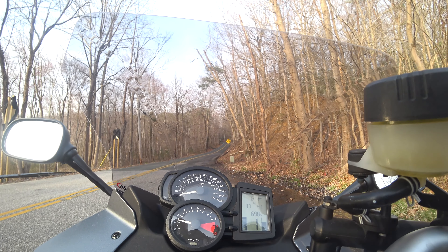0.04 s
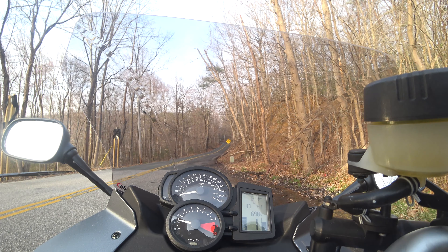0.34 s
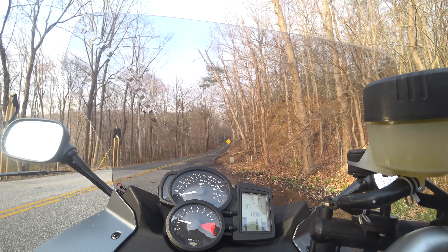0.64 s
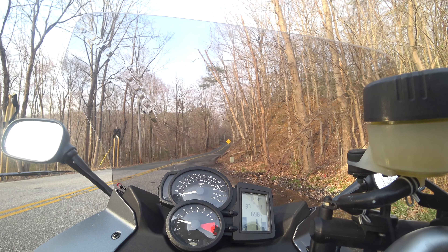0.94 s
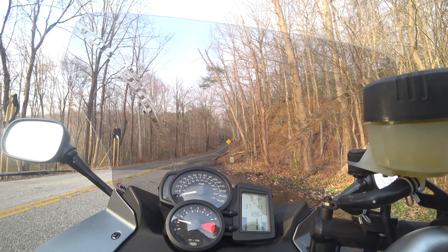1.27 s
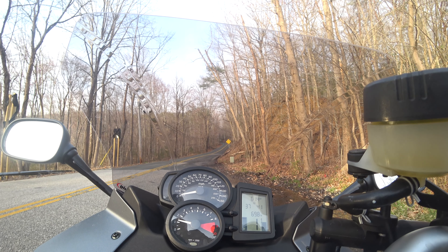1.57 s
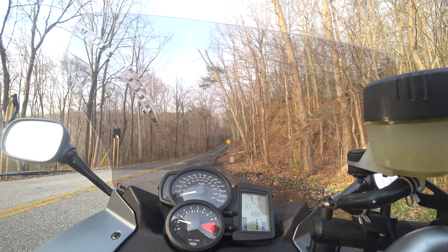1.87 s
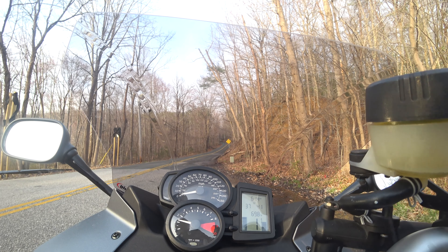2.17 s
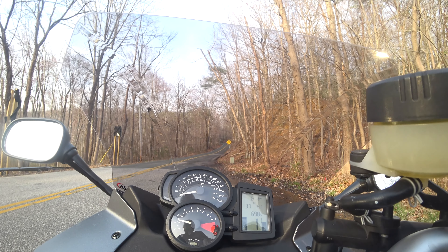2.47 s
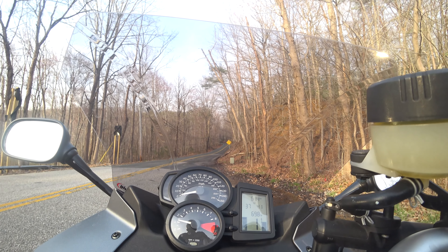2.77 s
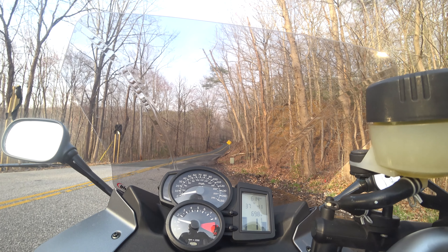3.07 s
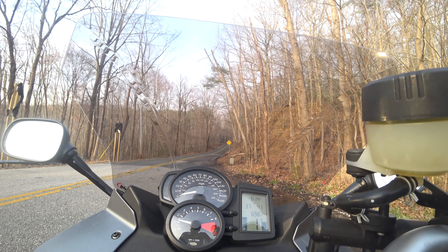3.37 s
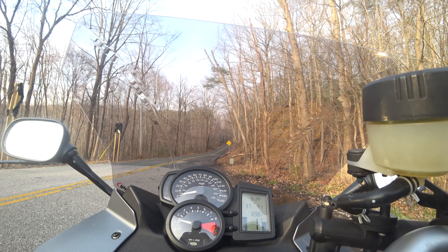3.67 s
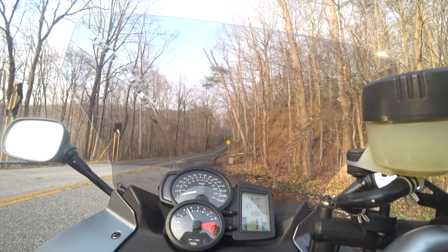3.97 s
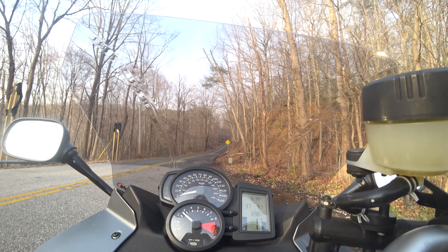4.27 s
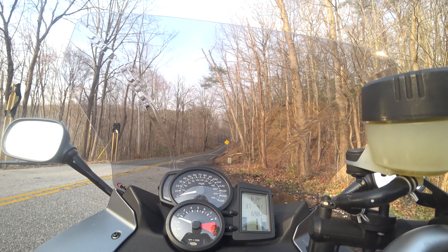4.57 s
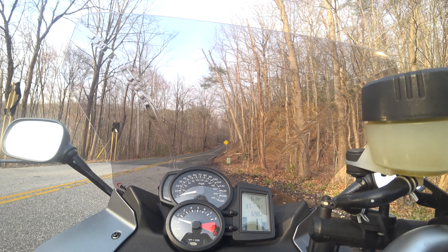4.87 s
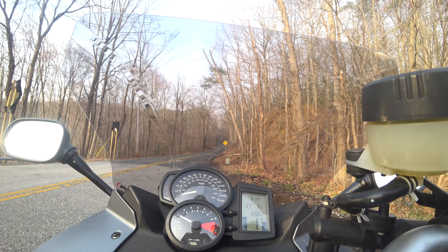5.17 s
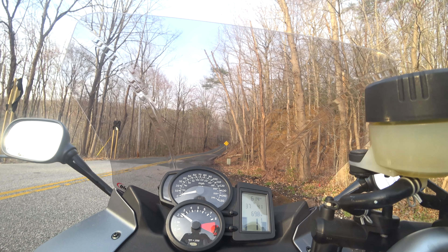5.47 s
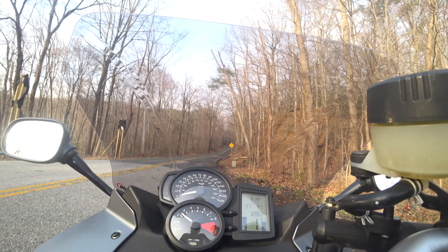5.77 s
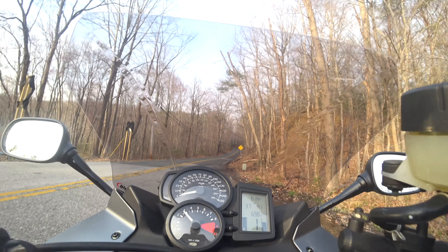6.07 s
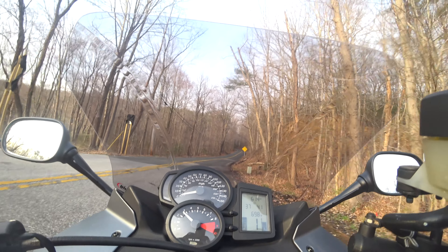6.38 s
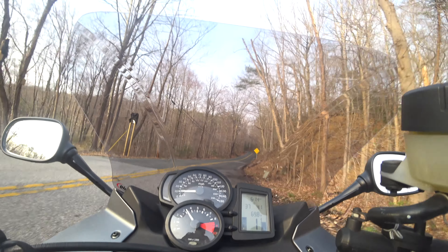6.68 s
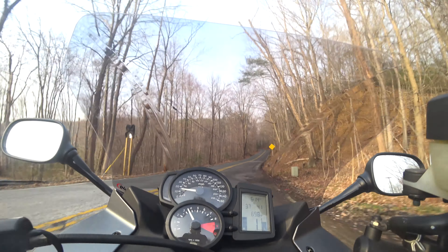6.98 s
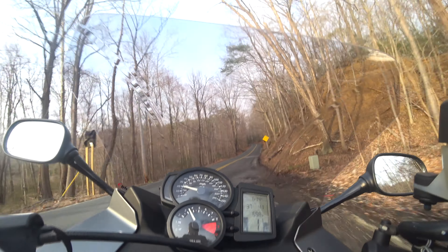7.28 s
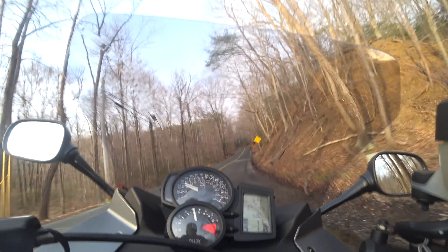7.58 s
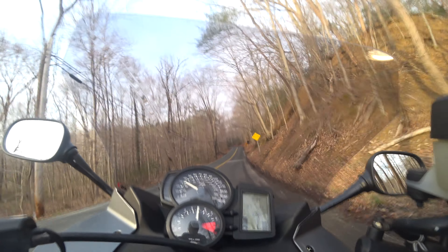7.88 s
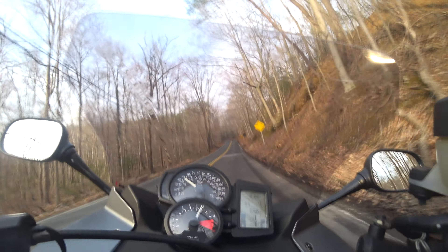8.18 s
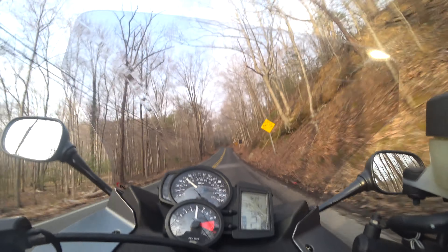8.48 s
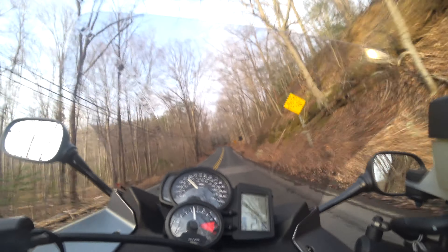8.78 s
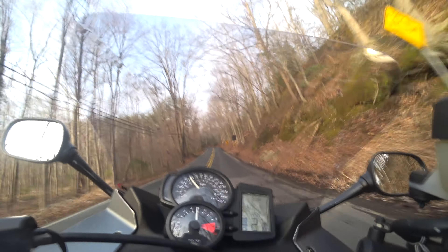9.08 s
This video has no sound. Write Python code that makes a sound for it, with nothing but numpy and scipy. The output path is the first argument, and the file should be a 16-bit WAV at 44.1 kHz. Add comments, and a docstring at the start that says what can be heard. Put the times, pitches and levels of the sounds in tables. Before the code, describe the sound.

A two-cylinder motorcycle idles with a low, uneven thudding, mechanical clatter and a few sharp valve ticks. The throttle is blipped once and the engine settles. It then pulls away with a wavering growl, gives a brief faint squeak and climbs in pitch. The note drops at an upshift and pulls again, while wind begins to rumble on a microphone mounted close behind the windscreen, outdoors on a road.

```python
"""On a motorcycle, at a camera behind the windscreen: the two-cylinder engine idles, is revved once,
then pulls away and shifts up. Evenly spaced firings boom through the camera mount and make the airbox
(the engine's air intake chamber) ring. Valves clatter and gears whine in step with them.
The windscreen adds a very quick echo, and wind starts to rumble as the bike gathers speed."""
import sys
import numpy as np
from scipy import signal
from scipy.fft import rfft, irfft
from scipy.io import wavfile
from scipy.ndimage import uniform_filter1d

SR = 44100
rng = np.random.default_rng(int(sys.argv[2]) if len(sys.argv) > 2 else 0)


def transcribe(signal):
    """Save signal, clipped to [-1, 1], as a 16-bit WAV file at the path in sys.argv[1]."""
    frames = np.atleast_2d(signal).T
    limited = np.clip(frames, -1, 1)
    pcm = np.round(limited * 32767).astype(np.int16)
    wavfile.write(sys.argv[1], SR, pcm)


N = 402633
TIME = np.arange(N) / SR
FREQ = np.arange(N // 2 + 1) * SR / N + 1e-3  # just above zero, so it is safe to divide by

# wind on the camera housing: t/s, level/dB
WIND_LEVELS = [(0, -75), (5.8, -70), (7.4, -42), (8.05, -43), (8.25, -25.5), (8.6, -35.5), (9.13, -30.5)]
# tone colour of the chain and gear hiss: f/Hz, relative level/dB
HISS_COLOUR = [(2940, -4), (5000, -6.5), (5840, -8.5), (7200, -6.5), (8090, -8.5), (9790, -6.5),
               (10900, -4.5), (11800, 2.5), (16000, -10)]
# gear teeth meeting: multiple of the firing rate, relative level/dB
GEAR_TONES = [(13, -35), (14, -40), (19, -39), (35, -38.5)]
# the sharpest valve ticks, then two clunks as the revving starts and as the gear engages: t/s, relative
# level/dB
SHARP_TICKS = [(0.2972, -39), (0.591, -35), (0.8839, -36), (1.5723, -34), (1.875, -36), (3.4451, -36),
               (3.7894, -35), (5.069, -34.5)]
# tone colour of the clatter, at idle and when pulling: f/Hz, relative level/dB
IDLE_CLATTER_COLOUR = [(450, -18), (720, -6), (1050, -1.5), (1600, -7), (2300, -11), (3400, -13),
                       (4300, -23), (5500, -28), (9000, -29.5)]
FAST_CLATTER_COLOUR = [(600, -3), (800, -4.5), (1150, -1), (1600, -4.5), (2300, -6.5), (3200, -10),
                       (4000, -13), (5000, -24.5), (9000, -51)]
# first gulps of air as the throttle snaps open: t/s, relative level/dB
AIR_GULPS = [(3.809, -21.5), (3.841, -12), (3.867, -14.5), (3.891, -15.5), (3.905, -17.5)]
# notes at which engine cases, gulps, intake ducts and airbox ring: f/Hz, width/Hz, relative level/dB
CASE_NOTES = [(1033, 9.9, 6.5), (1115.5, 62, 5), (1330, 127, -2), (1643, 40, -9)]
GULP_NOTES = [(236, 82, 6), (334, 51, 2.5), (526, 31, 16), (710, 120, -19)]
DUCT_NOTES = [(501.7, 20.3, 3.5), (538, 25, 4.5), (647, 130, -14.5), (709, 44, -8.5), (793, 30, -2)]
AIRBOX_NOTES = [(180.3, 22, 0), (254.4, 50, -1.5), (352, 22, -10.5)]
# notes at which the camera mount shakes: f/Hz, width/Hz, left gain, right gain
MOUNT_NOTES = [(52.4, 14.4, 0.5, 0.67), (72.1, 15, -1.23, 0.044), (99, 18.7, 0.36, 0.38)]
# firings per second on pulling away and shifting up, one for each turn of the crank: t/s, f/Hz
RIDE_RATES = [(5.05, 24.11), (5.15, 31.8), (5.21, 35.84), (5.31, 38.74), (5.48, 37.29), (5.84, 38.43),
              (5.98, 44.82), (6.06, 47.53), (6.3, 41.56), (6.57, 52), (6.71, 56.24), (6.9, 58.48),
              (7.16, 54.01), (7.25, 56.7), (7.47, 65.66), (7.97, 86.1), (8.12, 90.78), (8.23, 102.3),
              (8.39, 84.05), (8.45, 93.17), (8.49, 82.55), (8.55, 68.37), (9.04, 81.43), (9.13, 80)]
# the rider's hand on the throttle: t/s, opening (0 shut, 1 wide open)
RIDE_THROTTLE = [(5.05, 0.18), (5.3, 0.32), (5.82, 0.38), (6.0, 0.71), (6.22, 0.55), (6.52, 0.9),
                 (6.72, 0.78), (6.92, .58), (7.1, 0.78), (8.14, 0.72), (8.19, 0.53), (8.36, 0.21),
                 (8.42, 0.69), (8.62, 0.68), (9.13, 0.75)]
# the engine with the throttle shut: firing rate f/Hz, then level/dB of exhaust, drone, bark, clatter, hiss
SHUT_LEVELS = [(20.9, -37.7, -50, -52.5, -43.5, -57), (41, -30.3, -43.5, -44, -34.5, -51.5),
               (56.6, -28, -37, -39, -32.5, -50), (74.4, -35, -35, -37.5, -29.5, -47),
               (101, -40, -36, -40, -27.5, -45.5)]
# what a wide-open throttle adds: level/dB for each of those five sounds
OPEN_BOOSTS = (6.3, 16.2, 17.35, 0.9, 1.2)
# the clutch slips or spins free and the hiss swells (rev, pull-away, shift): t/s, length/s, rise/dB
CLUTCH_SLIPS = [(3.795, 0.42, 4.5), (5.797, 0.92, 3.5), (8.08, 0.41, 6.5)]

# single swells: t/s, length/s, rise/dB
FLUTTER = (1.24, 0.87, 4.8)  # the airbox flutters louder during the idle
FREE_REV = (3.68, 0.58, 2.9)  # with no load, the revving engine rattles harder
HONK = (7.5, 0.4, 3.8)  # the ducts honk as the clutch bites
OVERRUN = (8.27, 0.16, 15)  # the exhaust booms as the rider eases off to shift
TAKE_UP = (8.39, 0.058, 6.8)  # the cases rattle as the next gear starts to pull

IDLE_HZ, BLIP_HZ, BLIP_S = 20.32, 60.04, 3.778  # the "blip" is the one quick rev while standing


def undb(db):
    """Turn decibels into a number to multiply by."""
    return 10 ** (np.asarray(db) / 20)


def curve(table):
    """Join (time, value) points with straight lines, one value per sample."""
    return np.interp(TIME, *np.transpose(table))


def swell(start, length, rise_db):
    """An arch-shaped rise and fall, in dB."""
    return rise_db * np.sin(np.pi * np.clip((TIME - start) / length, 0, 1))


def noise():
    """White noise: an even hiss."""
    return rng.standard_normal(N)


def unit(x):
    """Scale a sound so its average strength (rms) is 1."""
    return x / np.sqrt(np.mean(x ** 2))


def steady(x, size=4340):
    """Hold the strength of a sound near 1 over time, leaving its single beats intact."""
    power = np.atleast_2d(x).mean(axis=0) ** 2
    return x / np.sqrt(uniform_filter1d(uniform_filter1d(power, size), size // 2) + 1e-18)


def shape(x, response):
    """Filter a sound: the response says how much of each frequency gets through."""
    return irfft(rfft(x) * response, N)


def waver(hz):
    """A smooth random wobble of strength 1, changing up to about hz times a second."""
    return unit(shape(noise(), 1 / (1 + (FREQ / hz) ** 4)))


def colour(points):
    """A filter drawn through (f/Hz, level/dB) points."""
    hz, db = np.transpose(points)
    return undb(np.interp(np.log(FREQ), np.log(hz), db))


def resonance(hz, width):
    """A filter that rings at one note; the smaller the width, the longer it rings."""
    return 1 / (1 + 1j * (FREQ - hz ** 2 / FREQ) / width)


def body(notes):
    """A filter for an object that rings at several notes."""
    return sum(undb(db) * resonance(hz, width) for hz, width, db in notes)


def windscreen(delay_s=1 / 265, share=0.56, dull_hz=9800):
    """A filter that adds the windscreen's echo, which lacks the highest treble."""
    return 1 + share * np.exp(-2j * np.pi * FREQ * delay_s) / (1 + (FREQ / dull_hz) ** 10)


def stereo_noise(loudness, response, side_db):
    """Pulsing noise: a middle part with the windscreen's echo, and a side part for width."""
    mid = shape(loudness * noise(), response * windscreen())
    side = shape(loudness * noise(), response) * undb(side_db)
    return np.array([mid + side, mid - side])


def burst(turns, start, length):
    """A loudness that jumps up at the same point of every turn, then fades; both given in turns."""
    return np.exp(-((turns - start) % 1) / length)


def firings(turns, scatter_db, uneven_db):
    """One click per turn; the two cylinders differ a little and no two firings are alike."""
    at = np.flatnonzero(np.diff(np.floor(turns[:-1])) > 0)
    late = (np.ceil(turns[at]) - turns[at]) / (turns[at + 1] - turns[at])
    size = undb(scatter_db * rng.standard_normal(len(at)) + uneven_db * (-1) ** np.arange(len(at)))
    clicks = np.zeros(N)
    clicks[at], clicks[at + 1] = size * (1 - late), size * late  # each click falls between two samples
    return clicks


def camera_whine():
    """Faint steady tones from the camera's electronics."""
    tones = [(7499, -81), (8495, -81), (9001, -81), (13501, -75)]
    return sum(undb(db) * np.sin(2 * np.pi * hz * TIME) for hz, db in tones)


def wind():
    """Wind buffets the housing with a low rumble, different in each ear."""
    rumble = colour([(10, -3), (30, 7), (60, -1.5), (130, -6), (400, -12), (2000, -45)])
    return undb(curve(WIND_LEVELS)) * np.array([unit(shape(noise(), rumble)) for _ in range(2)])


def squeal(hz=9800, db=-52):
    """A thin squeal as the engine speed peaks at the gear change."""
    fade = np.interp(TIME, [7.9, 8.25, 8.55], [0, 1, 0])
    return undb(db) * fade * unit(shape(noise(), resonance(hz, 157.4) ** 2))


def squeak(start_s=6.98, length_s=0.154, from_hz=1570, to_hz=1710, db=-32):
    """A short rising squeak as the bike rolls off."""
    along = np.clip((TIME - start_s) / length_s, 0, 1)
    hz = from_hz + (to_hz - from_hz) * along
    return undb(db) * np.sin(np.pi * along) * np.sin(2 * np.pi * np.cumsum(hz) / SR)


def hiss(turns, revs):
    """Chain and gears sizzle; above them lies an even hiss, the same in both ears."""
    pulse = 1 + 0.5 * burst(turns / 2, start=0.23, length=0.29)
    below_top = 1 / (1 + (FREQ / 11100) ** 40)
    sizzle = steady(stereo_noise(pulse, colour(HISS_COLOUR) * below_top, side_db=-0.5))
    top = unit(shape(noise(), (colour(HISS_COLOUR) + 0.26) * (1 - below_top)))
    return steady(sizzle + undb(-3 - 5.6 * revs) * top)


def gears(turns, rate, db_per_octave=4, rough=0.64):
    """Gear teeth whine through the cases, louder whenever they glide past a note the cases ring at."""
    teeth = 0
    for multiple, db in GEAR_TONES:
        strength = undb(db) * (1 + rough * waver(27))
        teeth = teeth + strength * np.sin(2 * np.pi * multiple * turns + rough * waver(21))
    cases = body(CASE_NOTES) + undb(-10) * resonance(722, 36)
    return shape(teeth, cases) * undb(db_per_octave * np.log2(rate / 80))


def valve_ticks(turns, revs, scatter_db=0.5, decay_s=0.0048):
    """At idle a valve shuts with a bright tick every second turn; a few ticks stand out, and two clunks join
    them."""
    cam = (turns / 2 - 0.25) % 1  # the camshaft works the valves and turns at half speed
    stroke = np.cumsum(np.diff(cam, prepend=1) < 0)
    force = undb(-43 + scatter_db * np.clip(rng.standard_normal(stroke[-1] + 1), -2, 2))
    regular = force[stroke] * np.exp(-cam / 0.06) * np.clip(1 - revs / 0.16, 0, 1)
    sharp = sum(undb(db) * (TIME >= s) * np.exp(-np.abs(TIME - s) / decay_s) for s, db in SHARP_TICKS)
    ring = colour([(900, -20), (1600, 13), (1900, 16), (2400, -2), (3500, 7), (5000, -7),
                   (9500, -5), (12000, -7), (16000, -26)])
    return undb(-3.5) * stereo_noise(np.maximum(regular, sharp), ring, side_db=-8)


def clatter(turns, revs):
    """Valves and pistons knock on the cases in step with the crank; at speed this blurs into a rasp."""
    rattle = 0.39 + 0.5 * burst(turns, 0.42, 0.14) + 0.35 * burst(turns, 0.86, 0.18)
    knocks = 0.57 + 2.6 * burst(turns, 0.43, 0.19) + 0.5 * burst(turns, 1.0, 0.22)
    valves = 0.14 + burst(turns / 2, 0.21, 0.032) + 0.4 * burst(turns / 2, 0.7, 0.076)
    cases = body(CASE_NOTES) * resonance(1136, 810)
    slow = steady(stereo_noise(rattle, colour(IDLE_CLATTER_COLOUR), side_db=-17))
    slow += undb(-0.5) * steady(stereo_noise(knocks, cases, side_db=-18))
    slow += undb(-6.5) * steady(stereo_noise(valves, resonance(1928, 140) ** 2, side_db=-7.5))
    rasp_colour = colour(FAST_CLATTER_COLOUR) * (1 + 0.6 * resonance(3185, 44) + 0.25 * resonance(2885, 40))
    rasp = steady(stereo_noise(1 + burst(turns, 0.19, 0.75), rasp_colour, side_db=-8.5))
    ring = steady(shape(firings(turns, scatter_db=1.2, uneven_db=1.5), cases * resonance(1100, 600)))
    fast = rasp + undb(-4 + 6 * revs) * ring
    blur = np.clip(revs / 0.43, 0, 1)
    return steady(np.sqrt(1 - blur) * slow + np.sqrt(blur) * fast)


def gulps():
    """The throttle snaps open and the first few gulps of air bark through the airbox."""
    clicks = np.zeros(N)
    for s, db in AIR_GULPS:
        clicks[int(s * SR)] += undb(db)
    ring = body(GULP_NOTES) * resonance(360, 490)
    return undb(-1) * shape(clicks, ring) / np.abs(irfft(ring, N)).max()


def pipe_echoes(trips_s=(0.0017, 0.0029, 0.0053), share=0.57):
    """Trips up and down the pipes smear each pulse in time without changing its tone colour."""
    echoes = [np.exp(-2j * np.pi * FREQ * trip) for trip in trips_s]
    return np.prod([(echo - share) / (1 - share * echo) for echo in echoes], axis=0)


def breathing(turns, revs, response, air, idle_db, fast_db):
    """The engine breathes through a duct: a flutter at idle, soft beats at low speed, then a tone."""
    clicks = shape(firings(turns, scatter_db=0.7, uneven_db=0.7), pipe_echoes())
    beats = steady(shape(clicks, air * resonance(234, 580)))
    ringing = shape(clicks, response) / np.sqrt(np.gradient(turns) * np.mean(np.abs(response) ** 2))
    soft = 2.6 * np.exp(-(revs / 0.22) ** 2)
    tone = (ringing + soft * beats) / np.hypot(1, soft)
    rush = steady(stereo_noise(0.25 + burst(turns, 0.47, 0.98), air, side_db=-5))
    breath = undb(fast_db + (idle_db - fast_db) * np.exp(-revs / 0.14))  # rushing air against tone
    return (tone + breath * rush) / np.hypot(1, breath)


def duct_bark(turns, revs):
    """The intake ducts ring and give the growl its edge."""
    tilt = colour([(150, -46), (340, 5), (470, 2.5), (860, 0), (1000, -5.5), (2500, -79)])
    air = colour([(300, -6), (450, 5), (570, 6), (740, -2.5), (850, -24), (1100, -34), (2500, -41)])
    return breathing(turns, revs, body(DUCT_NOTES) * tilt, air, idle_db=6, fast_db=-16)


def airbox_drone(turns, revs):
    """The airbox sings whenever a multiple of the firing rate meets one of its notes."""
    tilt = colour([(90, -11), (150, -52), (175, -4), (197, -30.5), (215, 2.5), (245, 6.5),
                   (285, 9.5), (310, 6), (390, -2), (500, 4), (1200, -49)])
    air = colour([(90, -13), (165, 1), (260, 4.5), (350, 0), (420, -32), (900, -82)])
    sung = breathing(turns, revs, body(AIRBOX_NOTES) * tilt, air, idle_db=4, fast_db=-18)
    # coasting on a shut throttle, it sounds deeper and hollower
    coasting = np.exp(-(throttle() / 0.22) ** 2) * np.clip(revs / 0.21, 0, 1)
    hollow = shape(sung, colour([(180, 10), (225, -1), (270, -14), (400, -5)]))
    return (1 - coasting) * sung + coasting * hollow


def exhaust(turns, revs):
    """Firings boom through the mount, which rocks so the two sides differ; at idle they thud unevenly."""
    mount = sum(np.outer(gains, resonance(hz, width)) for hz, width, *gains in MOUNT_NOTES)
    muffler = colour([(18, -30), (38, 6.5), (55, 6), (90, 3), (118, 4.5), (150, -3), (300, 6), (900, -14)])
    boom = steady(shape(firings(turns, scatter_db=0.84, uneven_db=0.5), mount * muffler))
    thud_ring = -np.array([resonance(90.1, 25), resonance(91.8, 23.7)]) ** 2
    thuds = steady(shape(firings(turns, scatter_db=3.5, uneven_db=1.5), thud_ring))
    # the pistons add a throb at the crank's rate and at twice that rate
    throb = np.sin(4 * np.pi * (turns + 0.1)) + 0.18 * np.sin(2 * np.pi * turns)
    gas = stereo_noise(burst(turns, 0, 0.56), resonance(88, 41) ** 2, side_db=1.5)
    idle = thuds + undb(1) * throb + undb(-6) * steady(gas)
    idling = np.clip(1 - revs / 0.24, 0, 1)
    return steady((1 - idling) * boom + idling * idle)


def throttle(open_s=0.045, shut_s=0.052):
    """How far the throttle is open: shut at idle, one quick snap for the blip, then the ride."""
    snap = np.interp(TIME - BLIP_S, [0, open_s, open_s + shut_s], [0, 1, 0])
    return np.where(TIME < RIDE_THROTTLE[0][0], snap, curve(RIDE_THROTTLE))


def firing_rate(run_up_s=0.2, hang_s=0.04, coast_hz_per_s=84):
    """Firings per second: idle, a blip that runs up, hangs and coasts back down, then the ride."""
    since = TIME - BLIP_S
    run_up = (BLIP_HZ - IDLE_HZ) * np.sin(np.pi / 2 * np.clip(since / run_up_s, 0, 1))
    coast = coast_hz_per_s * np.maximum(since - run_up_s - hang_s, 0)
    return np.where(TIME < RIDE_RATES[0][0], IDLE_HZ + np.maximum(run_up - coast, 0), curve(RIDE_RATES))


def scene(wobble_turns=0.003, wander_db=0.7):
    """One slightly unsteady crank drives the engine's sounds; speed and throttle set their loudness."""
    rate, opening = firing_rate(), throttle()
    turns = 0.5 + np.cumsum(rate) / SR + wobble_turns * waver(10)
    revs = np.clip((rate - 21) / 80, 0, 1)  # 0 at idle, 1 at the gear change
    rates, *shut_levels = np.transpose(SHUT_LEVELS)
    voices = [(exhaust, swell(*OVERRUN)),
              (airbox_drone, swell(*FLUTTER)),
              (duct_bark, swell(*HONK)),
              (clatter, swell(*FREE_REV) + swell(*TAKE_UP)),
              (hiss, sum(swell(*slip) for slip in CLUTCH_SLIPS))]
    engine = 0
    for (voice, swell_db), shut_db, boost_db in zip(voices, shut_levels, OPEN_BOOSTS):
        db = np.interp(rate, rates, shut_db) + boost_db * opening + swell_db + wander_db * waver(4.5)
        engine = engine + voice(turns, revs) * undb(db)
    bike = engine + gears(turns, rate) + valve_ticks(turns, revs) + gulps() + squeak() + squeal()
    return bike + wind() + camera_whine()


def record(dry, left_db=0.42, top_hz=16350):
    """The camera hears a little more on the left and sharply cuts off the highest treble."""
    balance = undb([[left_db], [-left_db]])
    return signal.sosfilt(signal.ellip(10, 0.2, 80, top_hz, fs=SR, output="sos"), balance * dry)


dry = scene()
out = record(dry)
transcribe(out)
```